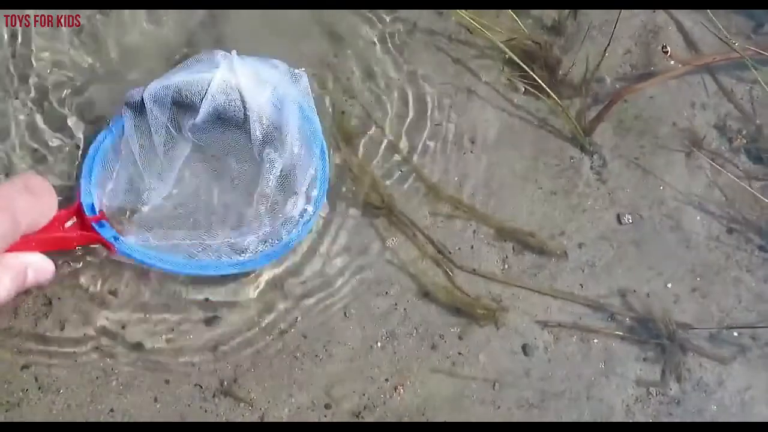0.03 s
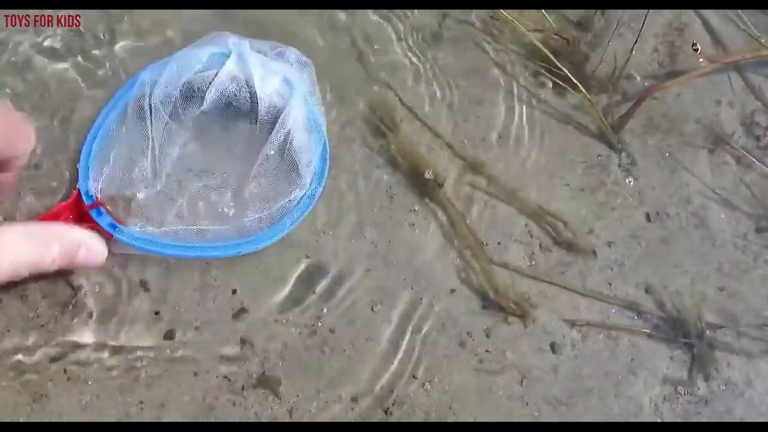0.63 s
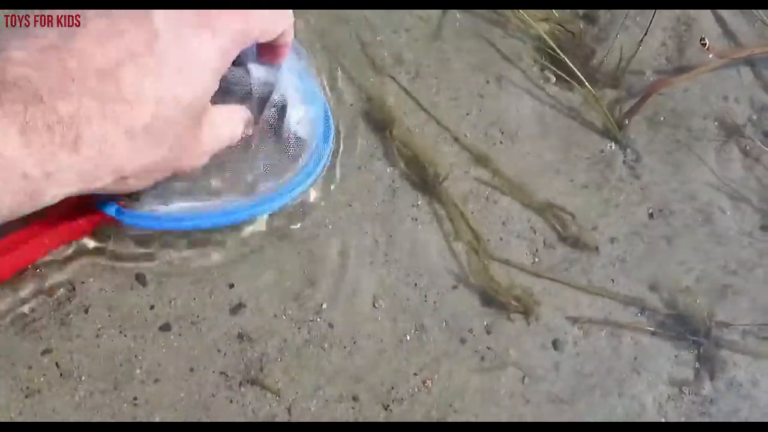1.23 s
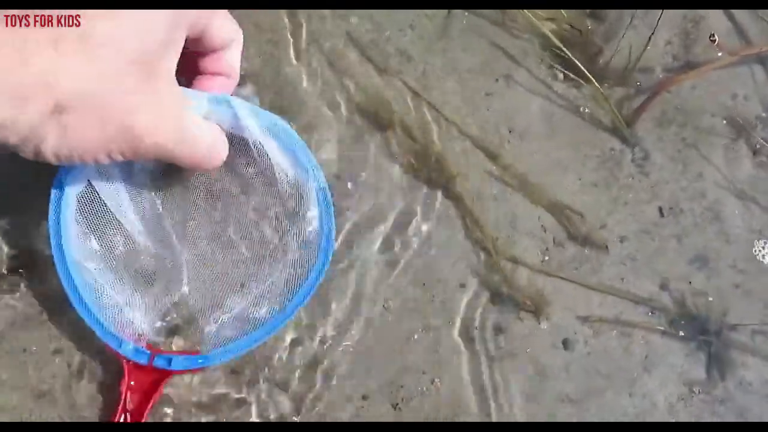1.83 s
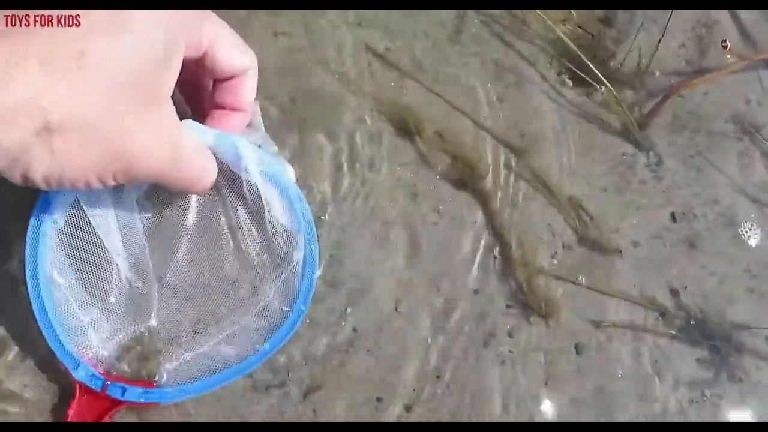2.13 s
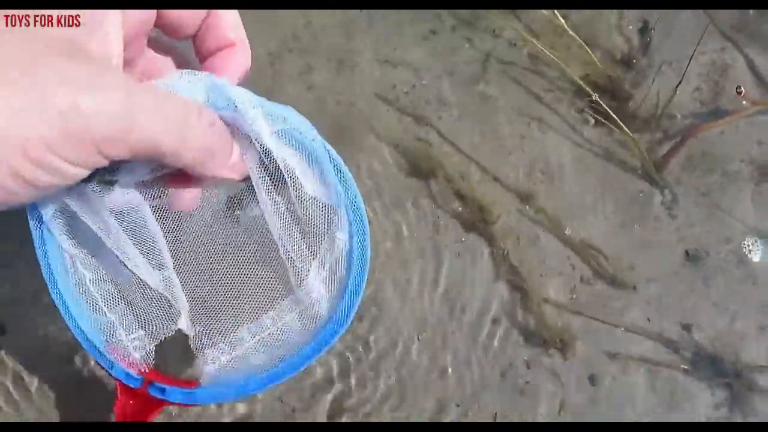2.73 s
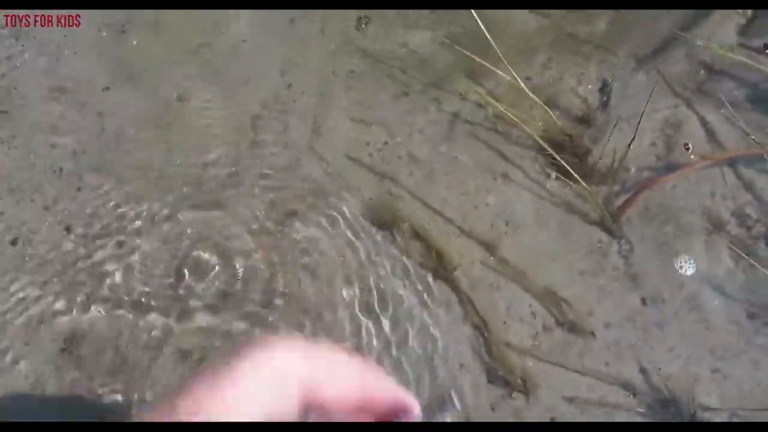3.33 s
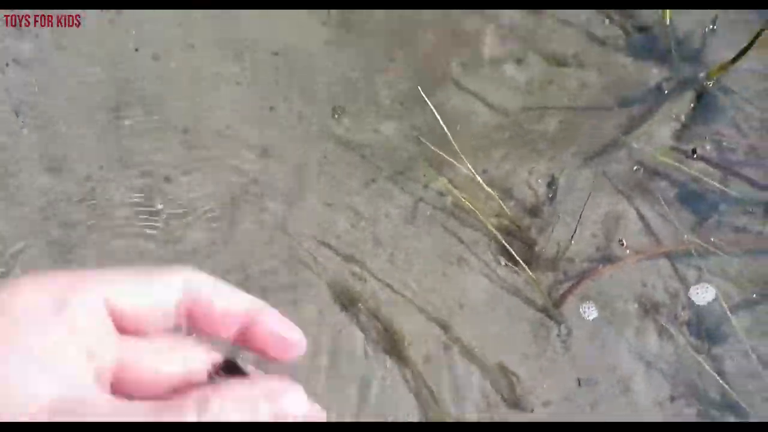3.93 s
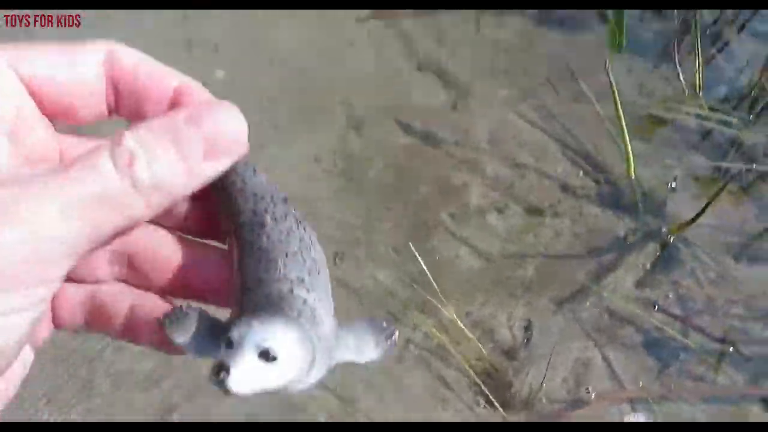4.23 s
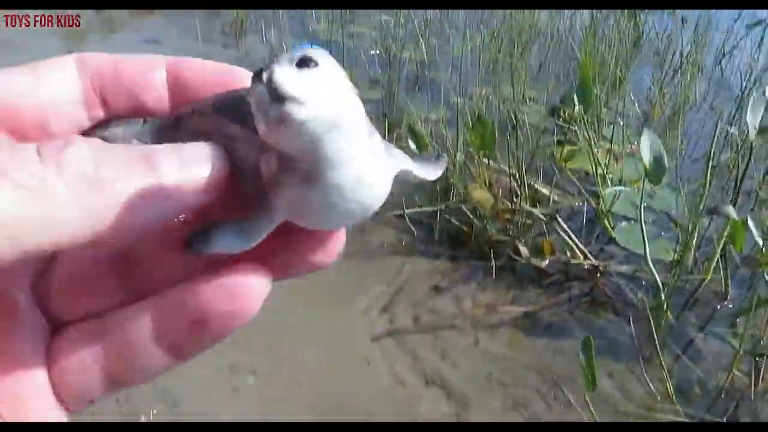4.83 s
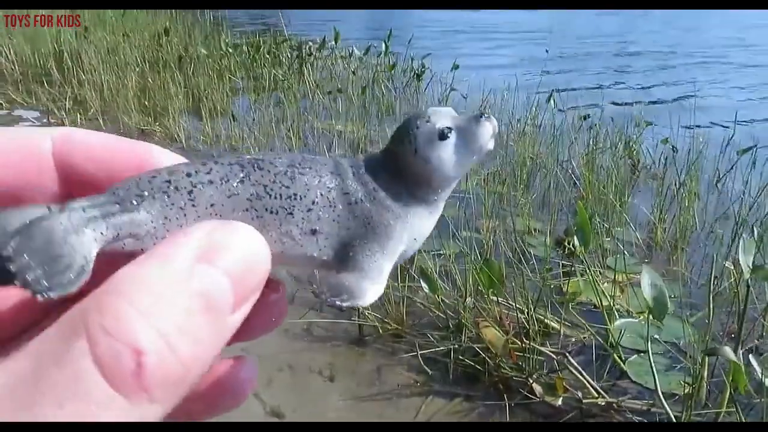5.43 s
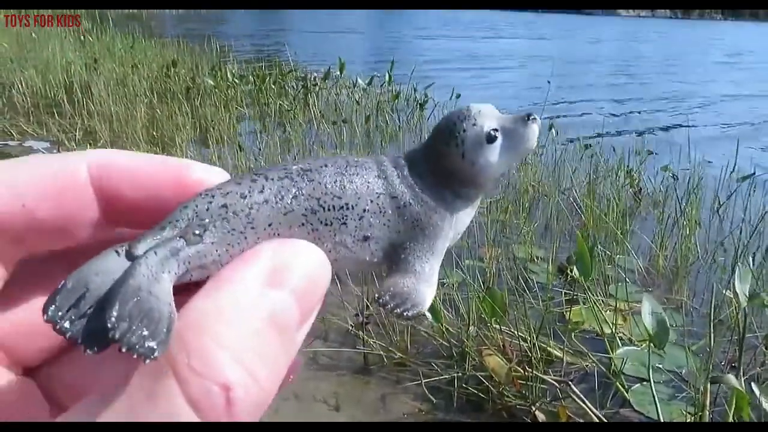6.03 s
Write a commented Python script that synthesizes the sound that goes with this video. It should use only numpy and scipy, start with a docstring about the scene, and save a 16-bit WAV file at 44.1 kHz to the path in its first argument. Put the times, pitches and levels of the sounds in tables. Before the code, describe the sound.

At the edge of a lake, a small net is swept through the shallows and lifted out, heard up close. After three short, wet plastic squeaks, the water sloshes in uneven bursts, each swelling and settling into plops, gurgles and droplets. A longer, brighter splash comes later, followed by a low thump of wind on the microphone and more gentle sloshing. Soft distant lapping and a light breeze continue underneath.

```python
"""Hand net in shallow lake water

A small net is worked through the water and lifted out, close by. Each slosh builds, holds and settles
in ringing bubbles, rising gulps, plops and spray. Three wet stick-slip squeaks open the scene, likely
fingers on the plastic. Wavelets lap further off in a light breeze. Dull low thumps and swells:
deep glugs and gloops of water early on, knocks and puffs of wind later."""
import sys
import numpy as np
from scipy import signal
from scipy.io import wavfile

SR = 44100
rng = np.random.default_rng(int(sys.argv[2]) if len(sys.argv) > 2 else 0)


def materialize(psi):
    """Save the field psi as 16-bit PCM at rate SR to the path in sys.argv[1].

    A 1-D psi becomes a single channel; in a 2-D psi each row is a channel.
    """
    bounded = np.clip(np.atleast_2d(psi).T, -1, 1)
    quanta = np.round(bounded * 32767).astype(np.int16)
    wavfile.write(sys.argv[1], SR, quanta)


N = 268965

# left-right noise correlation: f/Hz, correlation/1
COHERENCE = [(60, 0.94), (150, 0.93), (300, 0.59), (1200, 0.68), (2500, 0.55), (5300, 0.64), (11000, 0.35)]
# far lapping, per third octave: f/Hz, level/dB
LAKE_SPECTRUM = [(200, -69.5), (500, -63.5), (1100, -63), (2500, -67), (5000, -69), (9000, -70.5),
                 (11500, -71)]
# colour of breeze and low swells, per third octave: f/Hz, gain/dB
RUMBLE_SPECTRUM = [(25, -26), (45, -11), (75, -5), (120, -4.5), (165, -11.5), (250, -15), (400, -24)]
# low swells, water gloops early, wind puffs later: t/s, rise/s, fall/s, level/dB, deep weight/dB
LOW_SWELLS = [(.315, 0.022, 0.027, -40.5, -4), (1.675, 0.036, .02, -38, -11), (1.77, 0.042, .12, -36, -12),
              (2.41, 0.069, 0.084, -39, -6), (2.59, 0.017, 0.034, -41, 5), (2.68, 0.018, 0.068, -42, -13),
              (3.1, 0.024, 0.065, -32.5, -11), (3.175, 0.044, 0.033, -33.5, -10),
              (3.795, 0.015, 0.025, -39, 1), (4.02, 0.068, 0.5, -38, 0), (4.463, 0.032, 0.04, -31, 4.5),
              (4.96, 0.018, .04, -30.5, 8), (5.029, 0.051, .012, -23.5, 1), (5.12, 0.02, .03, -34.5, 4),
              (5.21, 0.022, 0.065, -38.5, 5), (5.58, 0.05, 0.085, -40, -3), (6, 0.063, .03, -30.5, 0.5),
              (6.09, 0.024, .03, -36, 6)]
# dull thumps, water glugs early, wind knocks later: t/s, length/s, f/Hz, level/dB, left lead/rad, L-R/dB
LOW_THUMPS = [(1.757, 0.026, 186, -28, -0.46, 7), (2.39, 0.039, 199, -28.5, .1, -5.5),
              (3.086, 0.042, 212, -27, -0.2, 7), (4.008, 0.016, 128, -24, 0.24, -3),
              (4.97, 0.027, 124.5, -23, 0.43, 8), (5.018, .034, 111.2, -12.5, 1.15, -6),
              (5.997, 0.026, 203.5, -22, 0.049, 4.5)]
# wet rubs: t/s, attack/s, hold/s, decay/s, level/dB, edge gain/dB, fastest at/s,
# fastest slip rate/Hz, slowest slip rate/Hz, rasp/1
RUBS = [(-.006, 0.01, 0.029, 0.013, -21, 4, 0.018, 773, 608, 0.28),
        (.102, 0.021, 0.028, 0.0058, -22, -5, .133, 939, 771, 0.17),
        (0.177, 0.0053, 0.018, 0.0043, -17.5, 3.5, .214, 1097, 634, .65)]
# squeak body resonances: f/Hz, width/Hz, gain/dB
BODY_MODES = [(915, 1000, -4.5), (1820, 1140, -2), (2980, 1170, 1), (3470, 500, 4), (4800, 600, -2.5),
              (5860, 240, 4.5), (7300, 270, -2), (9340, 1600, -6)]
# resonances of the squeak's sharp edge: f/Hz, width/Hz, gain/dB
EDGE_MODES = [(5950, 920, 5), (7290, 860, -1.5)]
# drops striking the water: t/s, level/dB, f/Hz
DROP_HITS = [(0.243, -25.5, 1680), (0.3156, -23, 1100), (0.3673, -35, 4760), (.491, -23, 1580),
             (0.5366, -28, 4360), (.652, -20.5, 1580), (.653, -28, 2900), (0.772, -34.5, 5130),
             (.852, -33, 930), (1.1025, -32.5, 5170), (1.625, -26.5, 660), (2.366, -31, 2970),
             (2.441, -17, 810), (2.549, -19, 1006), (2.627, -37, 7100), (3.002, -20.5, 1430),
             (3.307, -31, 1050), (3.529, -24, 1530), (3.6553, -31, 5030), (3.662, -25, 1440),
             (3.7052, -19, 1470), (4.0026, -28.5, 5530), (4.26, -17, 765), (4.579, -19, 603),
             (4.637, -23, 890), (5.592, -28, 2000), (5.6071, -25.5, 6840), (5.711, -14.5, 1250),
             (5.762, -23, 740), (5.956, -27, 990)]
# whole bubbles, no glide: t/s, length/s, f/Hz, level/dB
WHOLE_BUBBLES = [(.048, .04, 640, -34), (0.452, 0.097, 340, -39), (0.664, 0.025, 800, -21),
                 (2.115, .03, 559, -42), (2.982, .037, 378, -36.5), (4.06, 0.009, 1296, -21),
                 (4.122, 0.02, 643, -26), (4.214, 0.053, 410.5, -32), (4.376, .026, 338, -26.5),
                 (4.578, .015, 550, -22), (4.603, 0.033, 486, -27), (5.713, 0.014, 960, -24),
                 (5.951, 0.023, 990, -27.5)]
# shrinking air pockets: t/s, length/s, middle f/Hz, level/dB
SHRINKING_POCKETS = [(0.406, .05, 934, -29.5), (0.484, 0.025, 900, -32), (0.579, 0.05, 626.5, -27.5),
                     (0.628, 0.016, 2123, -35), (1.158, 0.016, 1010, -37), (1.617, 0.029, 680, -38),
                     (1.806, 0.046, 1132, -31), (2.342, 0.02, 406, -35), (2.427, 0.035, 778, -30.5),
                     (2.549, .029, 950, -32.5), (2.58, 0.018, 1160, -32), (3.006, 0.026, 1303, -33.5),
                     (3.167, .014, 760, -21), (3.18, 0.038, 853, -27.5), (3.25, .022, 1067, -27),
                     (3.526, 0.015, 1495, -29.5), (3.55, 0.026, 1138, -36), (3.727, 0.015, 556, -22.5),
                     (3.737, .029, 1010, -27.5), (3.803, 0.013, 2050, -37.5), (3.857, .027, 980, -32.5),
                     (4.286, 0.036, 491, -23.5), (4.316, 0.0248, 953, -28), (4.522, 0.029, 1148, -29.5),
                     (4.537, .013, 477, -24), (4.686, 0.012, 1000, -37), (4.733, 0.017, 545, -30),
                     (5.588, 0.0084, 2010, -32), (5.686, 0.018, 461, -29), (5.755, 0.025, 860, -24.5),
                     (5.981, 0.026, 1110, -29.5)]
# constant small ripples: t/s, level/dB
RIPPLE_LEVELS = [(0, -50.5), (.95, -59), (2, -57), (2.85, -59), (3.4, -52), (4.95, -53.5), (6.1, -52.5)]
# stirred water colour, per third octave: f/Hz, gain/dB
WATER_SPECTRUM = [(280, -17), (420, -9.5), (650, -5), (1000, -4), (1600, -4.5), (2600, -6.5), (4000, -5),
                  (6500, -3), (9000, -7), (11500, -9)]
# sloshes: crest t/s, build/s, hold/s, gurgle/dB, splash/dB, spray/dB, L-R/dB
NET_SLOSHES = [(.01, 0.037, 0.081, -45.5, -44, -57, -4.5), (0.286, .02, 0.012, -68, -46, -62, -1.5),
               (0.417, 0.04, 0.031, -41.5, -45, -56, -3), (0.482, 0.017, .012, -44, -39.5, -56, 0.5),
               (0.533, .008, .008, -50, -44, -48.5, 0), (0.582, 0.03, 0.042, -31.5, -44.5, -53, 0),
               (0.634, 0.018, .035, -37, -37, -48.5, -1), (1.095, 0.047, 0.084, -46.5, -52.5, -62.5, 7),
               (1.45, 0.069, 0.05, -43, -50, -65, -2), (1.615, 0.061, 0.053, -46, -46, -54, 5),
               (1.727, 0.046, 0.088, -43, -45.5, -59.5, 6), (2.244, .015, 0.072, -45, -43.5, -58, -0.5),
               (2.415, 0.073, 0.048, -36.5, -40.5, -53, -2.5), (2.52, 0.09, 0.059, -48.5, -46.5, -61, 0),
               (2.997, 0.016, 0.017, -48, -38, -68, 1), (3.078, 0.014, 0.012, -50, -41.5, -54.5, -1),
               (3.171, 0.036, 0.033, -37, -48.5, -73, 0), (3.246, .01, 0.017, -58, -44.5, -62.5, 2.5),
               (3.521, 0.031, 0.072, -44, -44.5, -60, 0.5), (3.686, 0.079, 0.094, -39, -47, -61, 5),
               (3.908, 0.046, 0.017, -45, -40, -52.5, -2), (4.052, .01, .014, -42, -31, -49, -3),
               (4.08, .05, .06, -36.5, -38, -47, -3.5), (4.255, .08, .075, -30.5, -38.5, -44.5, -2.5),
               (4.44, 0.078, 0.15, -35.5, -41, -47, 1.5), (4.527, 0.025, .1, -35, -42.5, -49.5, 2.5),
               (4.666, 0.08, 0.075, -38, -39, -52, 6), (4.787, .02, 0.017, -47, -49, -66, 4.5),
               (5.567, 0.17, 0.08, -42.5, -44.5, -51, 0.5), (5.708, 0.073, 0.041, -39, -39, -57, 0),
               (5.827, 0.048, 0.048, -46, -47.5, -51, 5), (5.967, 0.033, 0.016, -36, -39.5, -50, 5)]

SIDES = np.array([[1], [-1]])   # left, right


def from_db(db):
    """Decibels to gain."""
    return 10 ** (np.asarray(db) / 20)


def unit_rms(x):
    """Scale to rms 1."""
    return x / np.sqrt(np.mean(x ** 2) + 1e-20)


def per_sample(rows):
    """Interpolate rows of (t/s, values...) at every sample."""
    times_s, *columns = np.transpose(rows)
    return [np.interp(np.arange(N) / SR, times_s, column) for column in columns]


def at_hz(points, hz):
    """Interpolate on a log-frequency axis."""
    points = np.array(points)
    return np.interp(np.log(hz), np.log(points[:, 0]), points[:, 1])


def third_octaves(low_hz, count):
    """Band centres, ascending."""
    return low_hz * np.cbrt(2) ** np.arange(count)


def drift(rate_hz, size=N):
    """Random line segments, standard deviation 1."""
    position = np.arange(size) * rate_hz / SR
    knots = rng.standard_normal(int(position[-1]) + 2)
    return np.interp(position, np.arange(len(knots)), knots) * np.sqrt(3 / 2)


def band_noise(hz):
    """Third-octave stereo noise, less coherent in the treble; rms 1."""
    sos = signal.butter(2, [hz / 2 ** (1 / 6), hz * 2 ** (1 / 6)], "band", fs=SR, output="sos")
    mid, side = signal.sosfilt(sos, rng.standard_normal((2, N)))
    coherence = at_hz(COHERENCE, hz)
    return unit_rms(np.sqrt(1 + coherence) * mid + np.sqrt(1 - coherence) * side * SIDES)


def arch_window(length_s, peak_at=0.52):
    """Age 0..1 and a rounded arch over it."""
    age = np.linspace(0, 1, max(int(length_s * SR), 64))
    return age, np.sin(np.pi * age ** (np.log(.5) / np.log(peak_at)))


def surge(t, crest_s, rise_s, hold_s, fall_s):
    """Exponential rise, hold at 1, exponential fall."""
    return np.exp(-np.clip(np.maximum((crest_s - t) / rise_s, (t - crest_s - hold_s) / fall_s), 0, 30))


def add(out, start_s, sound):
    """Mix in a stereo sound."""
    at = int(np.clip(round(start_s * SR), 0, N - 1))
    out[:, at:at + sound.shape[1]] += sound[:, :N - at]


def placed_tone(envelope, phase, hz, pan_db=1.0, lag_s=.00003):
    """Sine with random left-right level and delay."""
    pan, lag = rng.standard_normal(2)
    return envelope * from_db(SIDES * pan * pan_db / 2) * np.sin(phase + SIDES * np.pi * hz * lag * lag_s)


def resonate(x, modes):
    """Parallel two-pole resonators, alternating in sign."""
    out = 0
    for k, (hz, width_hz, db) in enumerate(modes):
        radius = np.exp(-np.pi * width_hz / SR)
        b = np.array([1, 0, -1]) * (1 - radius ** 2) / 2
        a = [1, -2 * radius * np.cos(2 * np.pi * hz / SR), radius ** 2]
        out += (-1) ** k * from_db(db) * signal.lfilter(b, a, x)
    return out


def reflections(x, wet_db, t60_s):
    """Add brief diffuse echoes from hands, water and bank."""
    t = np.arange(SR // 5) / SR
    tail = rng.standard_normal((2, len(t))) * from_db(-60 * t / t60_s) * (1 - np.exp(-t / .002))
    tail /= np.sqrt(np.sum(tail ** 2, axis=1, keepdims=True))
    return x + from_db(wet_db) * signal.fftconvolve(x, tail, axes=1)[:, :N]


def lake(patchy_db=1.5):
    """Far wavelets merge into a soft, shifting wash."""
    return sum(from_db(at_hz(LAKE_SPECTRUM, hz) + patchy_db * drift(29)) * band_noise(hz)
               for hz in third_octaves(224.6, count=18))


def rumble(breeze_db=-55.5, breeze_deep_db=1.5, trim_db=2.5):
    """Steady breeze plus low noise swells: deep gloops of water early on, puffs of wind later."""
    t = np.arange(N) / SR
    swells = np.array([surge(t, crest_s, rise_s, 0, fall_s) for crest_s, rise_s, fall_s, *_ in LOW_SWELLS])
    *_, swell_db, deep_db = np.transpose(LOW_SWELLS)
    out = np.zeros((2, N))
    for hz in third_octaves(25, count=13):
        deep = at_hz([(50, 0.89), (120, -0.25), (250, -.3)], hz)
        power = from_db(breeze_db + deep * breeze_deep_db) ** 2
        power += from_db(swell_db + deep * deep_db) ** 2 @ swells ** 2
        out += np.sqrt(power) * from_db(trim_db + at_hz(RUMBLE_SPECTRUM, hz)) * band_noise(hz)
    return out


def thumps(waver=0.27, overtone=0.25):
    """Deep water glugs, later wind knocks: each a few uneven, lopsided cycles of low pressure."""
    out = np.zeros((2, N))
    for start_s, length_s, hz, db, lead_rad, pan_db in LOW_THUMPS:
        age, arch = arch_window(length_s)
        phase = 2 * np.pi * np.cumsum(hz * (1 + waver * drift(325, len(age)))) / SR
        pressure = np.sin(phase + SIDES * lead_rad / 2)
        pressure += overtone * np.sin(2 * phase + drift(154, len(age)))
        add(out, start_s, from_db(db + SIDES * pan_db / 2) * arch * pressure)
    return out


def squeaks(arch_s=.031, top_hz=11100, jitter=0.0486, pan_db=3, lead_s=.00003, trim_db=1.0):
    """Stick-slip, left of centre: pulses and friction noise drive resonances; pitch follows rub speed."""
    out = np.zeros((2, N))
    harmonics = np.arange(1, 19)[:, None]
    for start_s, attack_s, hold_s, decay_s, db, edge_db, fastest_s, fast_hz, slow_hz, rasp in RUBS:
        release_s = start_s + attack_s + hold_s
        t = np.arange(max(start_s, 0), release_s + 4 * decay_s, 1 / SR)
        slip_hz = slow_hz + (fast_hz - slow_hz) * np.exp(-((t - fastest_s) / arch_s) ** 2)
        pressure = np.clip((t - start_s) / attack_s, 0, 1) ** 0.43
        pressure *= np.exp(-np.maximum(t - release_s, 0) / decay_s)
        phase = 2 * np.pi * np.cumsum(slip_hz * (1 + rasp * jitter * drift(1504, len(t)))) / SR
        strength = 1 + 0.07 * drift(747, len(t))
        friction = rasp * rng.standard_normal(len(t)) * (1 + np.cos(phase)) / 2
        rolloff = 1 / (1 + (harmonics * slip_hz / top_hz) ** 30)
        channels = []
        for side in (1, -1):
            partials = rolloff * np.cos(harmonics * (phase + side * np.pi * slip_hz * lead_s))
            slips = unit_rms(partials.sum(axis=0)) * strength + friction
            ringing = resonate(slips, BODY_MODES) + from_db(edge_db) * resonate(slips, EDGE_MODES)
            channels.append(from_db(db + trim_db + side * pan_db / 2) * pressure * unit_rms(ringing))
        add(out, t[0], np.array(channels))
    return out


def droplets(spray_db, per_s=40, above_db=15, spread_db=4, highpass_hz=5500):
    """The finest droplets land as lone clicks, scaled by the spray level."""
    lands = rng.random(N) < per_s / SR
    size_db = spread_db * np.minimum(rng.exponential(1, N), 3) + 3 * rng.standard_normal((2, N))
    clicks = lands * from_db(spray_db + above_db + size_db)
    return signal.sosfilt(signal.butter(2, highpass_hz, "high", fs=SR, output="sos"), clicks + 1e-18)


def drops(cycles_at_1khz=2.47, rise=0.039, click_gain=0.085, click_s=0.00094):
    """Each drop clicks on impact and traps a briefly ringing bubble."""
    out = np.zeros((2, N))
    t = np.arange(SR // 20) / SR
    for start_s, db, hz in DROP_HITS:
        decay = t * np.sqrt(hz * 1000) / cycles_at_1khz
        phase = 2 * np.pi * hz * t * (1 + rise * np.tanh(decay / 2))
        impact = click_gain * rng.standard_normal((2, len(t))) * np.exp(-t / click_s)
        add(out, start_s, from_db(db) * (placed_tone(np.exp(-decay), phase, hz) + impact))
    return out


def air_pocket(length_s, middle_hz, db, octaves_per_s, rough=0.35, waver=0.052, froth_rad=0.075):
    """One ringing pocket; any glide accelerates, froth blurs the pitch."""
    age, arch = arch_window(length_s)
    glide_octaves = octaves_per_s * length_s * (age ** 1.405 - .42)
    hz = middle_hz * 2 ** glide_octaves * (1 + waver * drift(391, len(age)))
    phase = 2 * np.pi * np.cumsum(hz) / SR + froth_rad * drift(middle_hz * 2, len(age))
    envelope = from_db(db) * arch ** 0.35 * (1 + rough * drift(middle_hz / 2, len(age)))
    return placed_tone(envelope, phase, middle_hz)


def lesser_pockets(splash_db, per_s=22, median_s=.014, median_hz=720, above_db=1, spread_db=3):
    """Random rows like SHRINKING_POCKETS, scaled by the splash level."""
    count = int(per_s * N / SR)
    at = (rng.random(count) * N).astype(int)
    length, pitch, size = np.clip(rng.standard_normal((count, 3)), -2, 2).T
    level_db = splash_db[at] + above_db + spread_db * size
    return list(zip(at / SR, median_s * 2 ** (length / 2), median_hz * 2 ** (pitch / 2), level_db))


def gulps(splash_db, octaves_per_s_at_1khz=25.5):
    """Whole bubbles hold their note; shrinking pockets glide up, small ones fastest."""
    out = np.zeros((2, N))
    for start_s, length_s, hz, db in WHOLE_BUBBLES:
        add(out, start_s, air_pocket(length_s, hz, db, octaves_per_s=0))
    for start_s, length_s, hz, db in SHRINKING_POCKETS + lesser_pockets(splash_db):
        octaves_per_s = octaves_per_s_at_1khz * (hz / 1000) ** 0.68
        add(out, start_s, air_pocket(length_s, hz, db, octaves_per_s))
    return out


def bubbles(band_hz, rise=0.0933, spread_db=3.5, lag_span_s=.00008):
    """Steady stream of small bubbles in one band, each rising in pitch as it decays; rms 1."""
    per_s = 75 * np.sqrt(band_hz / 1000)
    cycles = 4.84 * np.cbrt(band_hz / 1000)
    onset, pitch, size, _, lag = rng.random((int(per_s * N / SR), 5)).T[:, :, None]
    samples = np.arange(int(4 * cycles * SR / band_hz))
    decay = samples * band_hz / (cycles * SR)
    hz = band_hz * np.cbrt(2) ** (pitch - .5)
    phase = 2 * np.pi * hz * samples / SR * (1 + rise * decay / 2)
    lead_rad = 2 * np.pi * hz * lag_span_s * (lag - .5)
    size_db = spread_db * np.minimum(-np.log(1 - size), 3.5)
    envelope = from_db(size_db) * np.exp(-decay) * (1 - np.exp(-2 * decay * cycles))
    at = ((onset * N).astype(int) + samples).ravel()
    channels = [envelope * np.sin(phase + side * lead_rad) for side in (1, -1)]
    return unit_rms(np.array([np.bincount(at, rings.ravel(), N)[:N] for rings in channels]))


def stirring_db(settle_s=(0.022, 0.041, 0.056), ripple_offsets_db=(-1.5, 0, -6)):
    """Gurgle, splash, spray levels: sloshes add power to the ripples; big bubbles settle first."""
    t = np.arange(0, N / SR, .001)
    ripple_db = np.interp(t, *np.transpose(RIPPLE_LEVELS))
    power = from_db([ripple_db + offset_db for offset_db in ripple_offsets_db]) ** 2
    for crest_s, build_s, hold_s, *levels_db, _ in NET_SLOSHES:
        for k, fall_s in enumerate(settle_s):
            power[k] += (from_db(levels_db[k]) * surge(t, crest_s, build_s, hold_s, fall_s)) ** 2
    return per_sample(np.transpose([t, *10 * np.log10(power)]))


def slosh(gurgle_db, splash_db, spray_db, spurt_db=1.32, patchy_db=1.5, trim_db=-0.1):
    """Stirred water: big bubbles gurgle, middling ones splash, the smallest fizz in hissing spray."""
    spurts_db = spurt_db * drift(70)   # water breaks in spurts common to all bands
    out = np.zeros((2, N))
    for hz in third_octaves(280, count=17):
        deep = at_hz([(600, 1), (1500, 0)], hz)
        fine = at_hz([(1800, 0.0091), (4500, 0.94)], hz)
        level_db = deep * gurgle_db + fine * spray_db + (1 - deep - fine) * splash_db
        bubble_share = 0.63 - 0.13 * fine
        water = np.sqrt(bubble_share) * bubbles(hz) + np.sqrt(1 - bubble_share) * band_noise(hz)
        flicker_db = spurts_db + patchy_db * drift(40)
        out += from_db(level_db + flicker_db + at_hz(WATER_SPECTRUM, hz) + trim_db) * water
    return out


def scene():
    """Near water, panned from slosh to slosh, and squeaks over thumps, rumble and lake."""
    gurgle_db, splash_db, spray_db = stirring_db()
    pan_points = sorted((crest_s + hold_s / 2, db) for crest_s, _, hold_s, *_, db in NET_SLOSHES)
    pan_db, = per_sample(pan_points)
    plops = gulps(splash_db) + drops() + droplets(spray_db)
    water = reflections(plops, wet_db=-11.5, t60_s=0.088) + slosh(gurgle_db, splash_db, spray_db)
    water *= from_db(SIDES * pan_db / 2)
    rubbing = reflections(squeaks(), wet_db=-9.5, t60_s=0.12)
    return water + rubbing + thumps() + rumble() + lake()


def record(dry):
    """Steep low-pass at 11.8 kHz."""
    return signal.sosfilt(signal.ellip(10, .1, 70, 11800, fs=SR, output="sos"), dry)


dry = scene()
out = record(dry)
materialize(out)
```